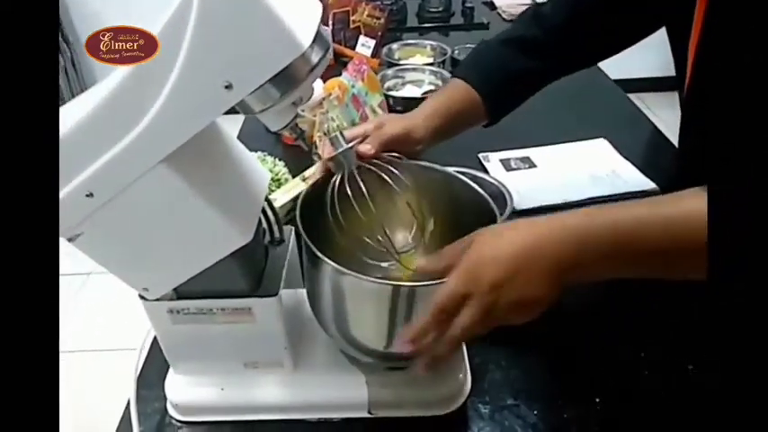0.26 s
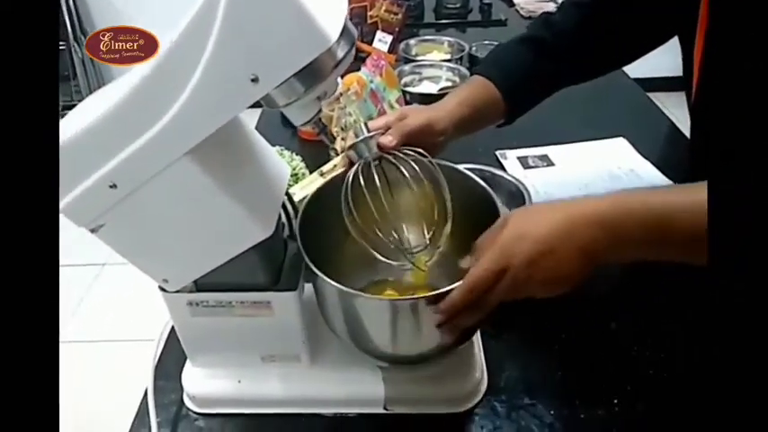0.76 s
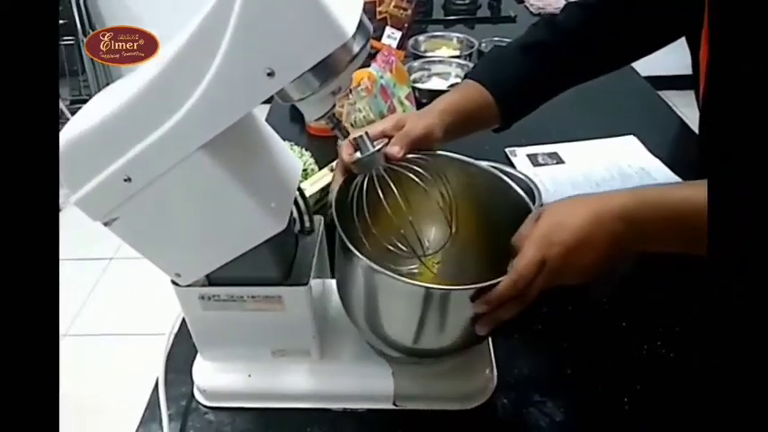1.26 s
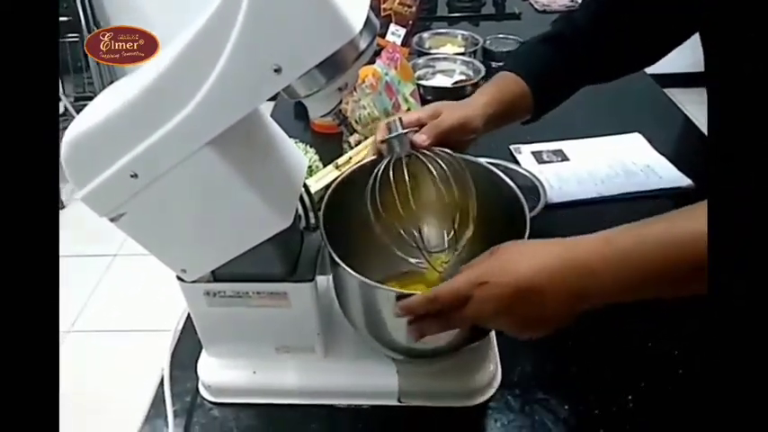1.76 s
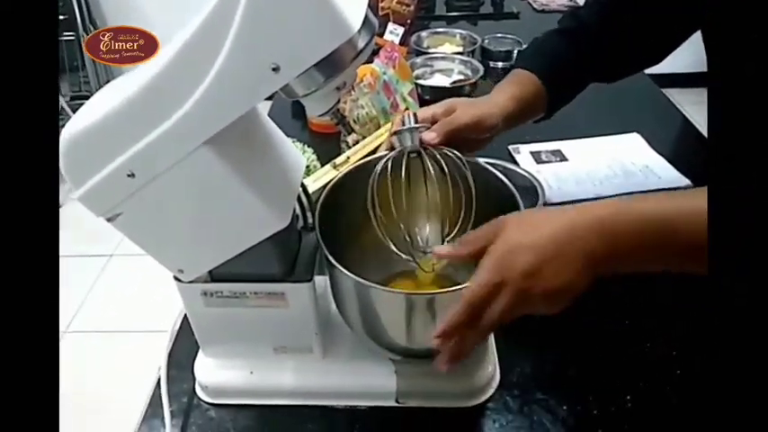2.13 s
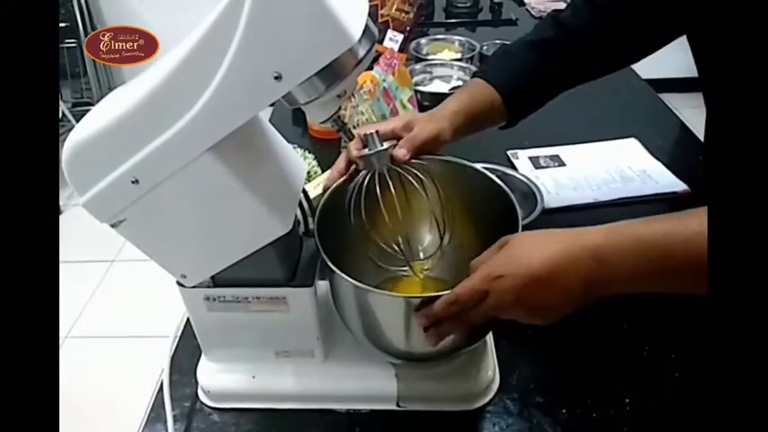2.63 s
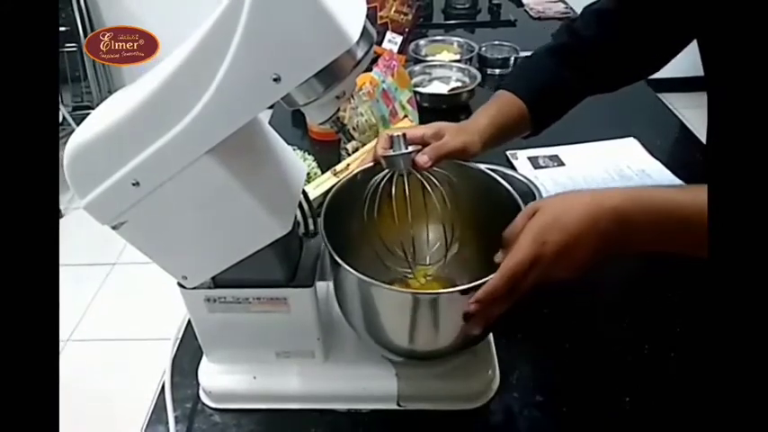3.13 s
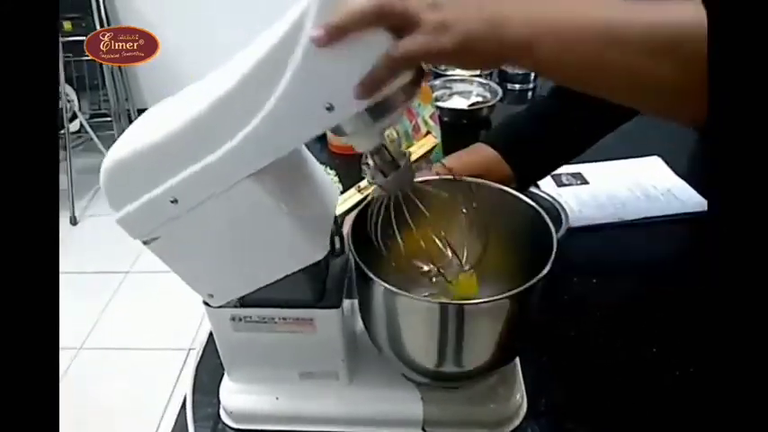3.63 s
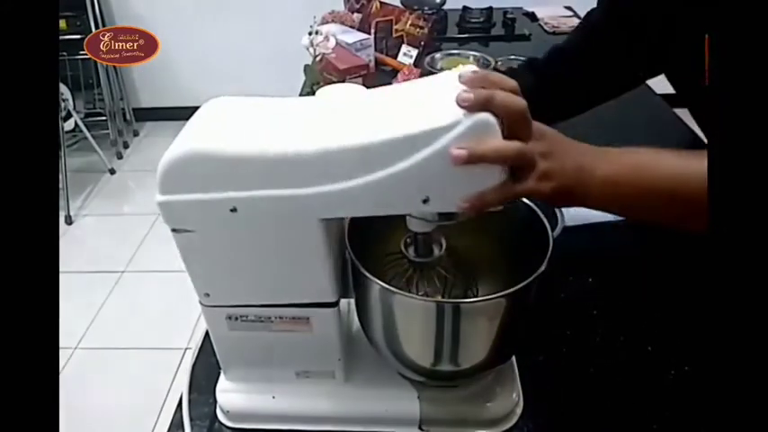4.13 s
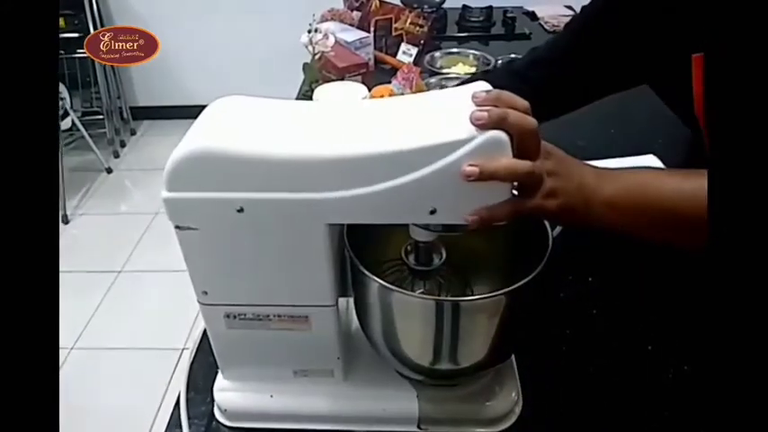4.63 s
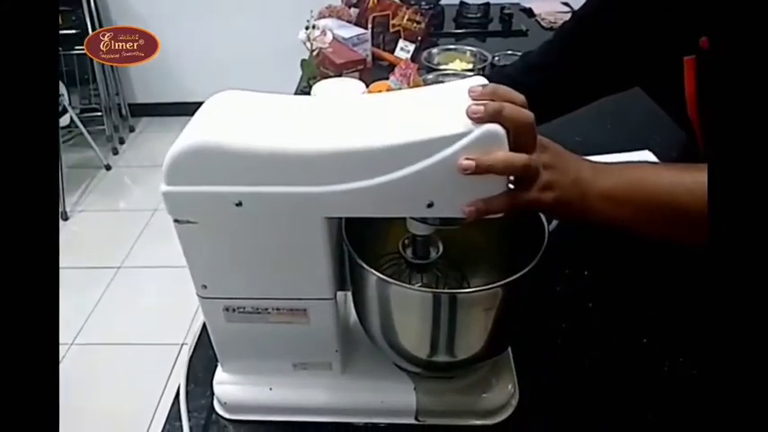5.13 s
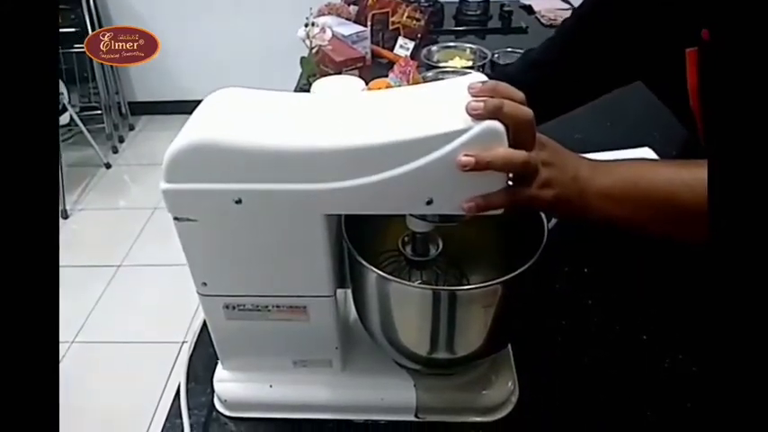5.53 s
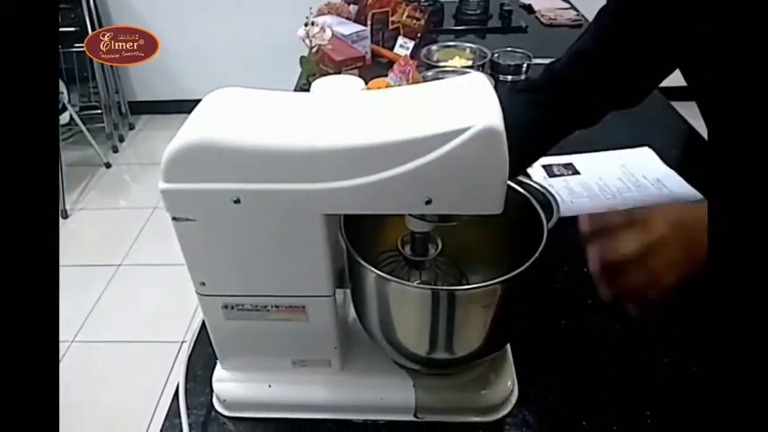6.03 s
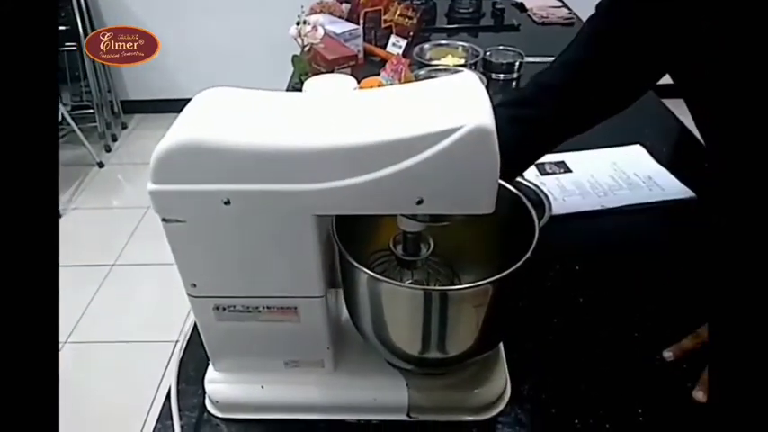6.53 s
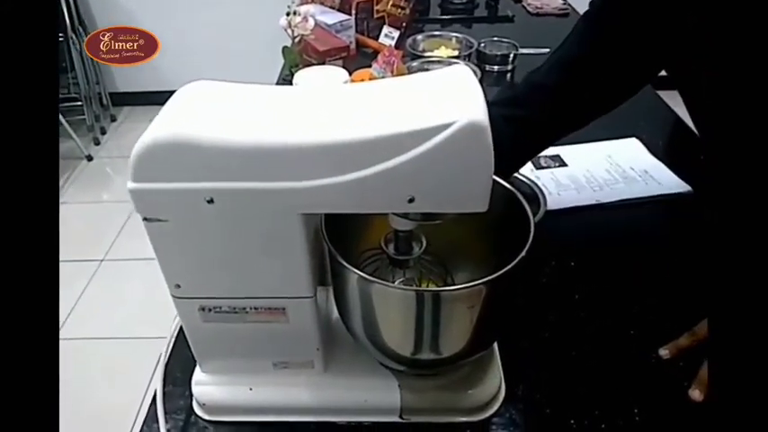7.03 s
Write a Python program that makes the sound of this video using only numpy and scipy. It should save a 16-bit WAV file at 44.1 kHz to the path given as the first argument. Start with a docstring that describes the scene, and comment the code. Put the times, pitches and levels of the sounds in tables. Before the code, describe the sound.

A nearby stereo camera microphone catches metal handling in a reverberant kitchen: strong bowl knocks first, then thin whisk clinks, sliding wires and little squeaks, with dull bumps through the counter. The mixer head scrapes free, groans as it swings down, and hits its stop with a bright, heavy clank. A smaller latch clack follows, then faint ticks over low air noise, its tails thinned by noise suppression.

```python
"""In a tiled kitchen a steel bowl is twisted onto the base of a stand mixer: ringing modes under a noisy contact.
A wire whisk clinks and slides on its wall, as bright modes and strokes of hiss; the rubbed rim squeaks.
The mixer's head is released, swings down on a groaning hinge, clanks home and latches.
The room answers the blows with blurred, decaying noise; the air murmurs underneath.
The camera's noise suppressor pulls the faint tails down."""
import sys
import numpy as np
from scipy import signal
from scipy.fft import rfft, irfft, next_fast_len
from scipy.io import wavfile
from scipy.ndimage import uniform_filter1d, map_coordinates

SR = 44100
rng = np.random.default_rng(int(sys.argv[2]) if len(sys.argv) > 2 else 0)


def master(y):
    """Save y as 16-bit WAV."""
    cut = np.clip(np.atleast_2d(y).T, -1, 1)
    pcm = np.round(cut * 32767)  # scale
    wavfile.write(sys.argv[1], SR, pcm.astype(np.int16))


N = 321489
T = np.arange(SR) / SR  # the life of one blow, s

# bowl knocks on its seat: (t/s, level/dB, chatter/s, brightness/dB per octave, room/dB, leading mode f/Hz,
# factor on the ring time: below 1 choked, above 1 ringing longer)
KNOCKS = [(0.0, -24.5, 0.0012, 0.5, -7, 686, 0.49), (.184, -46, 0.0064, -2.5, -4, 781, 0.58),
          (0.4929, -19, 0.0031, 0, -5.5, 690, 1.06), (.521, -36, 0.004, 1.5, -5, 425, 1.5),
          (.537, -33.5, 0.015, 3.5, 1.5, 280, 1.4), (.581, -37.5, 0.0026, -4, -3, 768, 1),
          (.605, -32.5, 0.0091, -3.5, -10, 759, 0.61), (0.705, -27.5, 0.0048, -1.5, -14, 1078, 0.44),
          (1.243, -43.5, 0.0028, -4.5, -3, 1048, 0.89), (1.271, -52, 0.0035, -6, -3, 690, .8),
          (1.487, -44, 0.0091, -1.5, 4.5, 1090, 0.29), (1.503, -48, 0.0018, 0, -5.5, 835, 1.2),
          (3.402, -52, 0.0022, -2.5, -1, 1081, 1.2), (3.56, -34.5, 0.0099, -2, -21, 506, 0.43),
          (3.566, -30.5, 0.011, 0, -23, 198.3, 0.44), (3.581, -38, .006, 1.5, -20, 445, 0.2)]
# whisk wires hit the bowl: (t/s, level/dB, brightness/dB per octave, leading mode f/Hz)
CLINKS = [(.259, -37.5, 1, 2732), (.296, -47.5, -5, 3160), (0.34, -44.5, -1.5, 3270),
          (.543, -41.5, -2, 2575), (0.548, -43.5, 9.5, 6450), (.681, -42.5, -5.5, 2760),
          (0.934, -48, 5, 3190), (1.055, -56.5, 6, 6270), (1.216, -49, 2.5, 5640), (1.226, -52, -4.5, 3220),
          (1.598, -47, 3, 3150), (1.615, -47.5, -3.5, 5590), (2.528, -49.5, 2, 2280),
          (2.537, -44, -3, 2530), (2.846, -50, 3, 6020), (2.981, -50.5, 4.5, 6080),
          (3.011, -51.5, 1.5, 5600), (3.06, -57, -4.5, 6280), (3.243, -50, 2.5, 6530),
          (3.258, -54.5, -7, 2290), (3.422, -45, 3.5, 6266), (3.43, -49.5, -9, 1850),
          (3.726, -49, -4.5, 4500)]
# wires slide along the bowl: (t/s, level/dB, length/s)
SLIDES = [(0.11, -63.5, 0.084), (0.301, -56, 0.095), (0.957, -54.5, .2), (2.335, -56.5, 0.13),
          (3.0, -60.5, .07), (3.261, -59, 0.066), (3.582, -49.5, 0.05), (4.82, -54.5, 0.1)]
# the rubbed rim sings briefly: (t/s, level/dB, f/Hz, length/s)
SQUEAKS = [(0.276, -43.5, 330.5, 0.097), (0.344, -48.5, 336, 0.07), (1.211, -47.5, 1036, 0.034),
           (1.894, -55, 346, 0.096), (2.375, -51, 401, 0.034), (2.428, -51.5, 321, 0.058),
           (3.233, -49, 1078, 0.044), (3.38, -51, 1075, 0.11), (3.476, -42, 779, 0.11)]
# the head clanks on catch, buffer, stop and latch, which rebounds: (t/s, level/dB, chatter/s,
# brightness/dB per octave, room/dB, leading mode f/Hz, its level/dB, all modes level/dB, room t60/s)
CLANKS = [(3.646, -27, 0.011, 0.44, -2.5, 782, -6.5, -7, 0.97),
          (4.3697, -27, 0.0055, 0, 0, 953, -0.5, 1.5, 0.37),
          (4.4219, -19, 0.005, 2, 4, 1057, -4.5, -4, 0.94), (5.295, -34, 0.004, 1, 0, 1051, -12, -6, 0.73),
          (5.309, -48, .003, -1, -2.5, 344, -7, -6, 0.49)]
# the hinge sticks and groans as the head swings: (t/s, level/dB, length/s, f/Hz)
GROANS = [(3.743, -38.5, 0.04, 393.5), (3.791, -44.5, 0.082, 356.2), (3.865, -39, 0.059, 358.5),
          (3.928, -44, 0.043, 350.5), (3.977, -48.5, 0.087, 330)]
# ticks and soft scrapes of the fittings: (t/s, level/dB, centre f/Hz, half width/octaves, t60/s)
FITTINGS = [(1.878, -48.5, 6790, 1, 0.0146), (2.12, -61, 7623, 0.85, 0.25),
            (2.846, -51.5, 1710, 0.25, 0.12), (2.98, -57, 1770, .2, 0.23),
            (3.061, -54.5, 1600, 0.58, 0.036), (3.486, -27.5, 1895, 0.77, 0.0073),
            (5.751, -55, 3157, 0.2, 0.087), (5.84, -60.5, 1149, .5, 0.25), (5.841, -59.5, 8300, 0.62, 0.11),
            (6.59, -66.5, 5250, 0.18, 0.69)]
# the mixer thumps on the counter: (t/s, level/dB, f/Hz)
THUMPS = [(0.536, -43.5, 79), (0.703, -36, 76.25), (2.741, -46, 54), (2.997, -42.5, 69), (3.137, -40.5, 55),
          (3.485, -27, 57), (3.559, -37, 79.6), (4.424, -46.5, 58.24)]

# ringing modes of each part: (f/Hz, level/dB, t60/s)
BOWL_MODES = [(343, -5.5, 0.64), (420.7, -4, 0.36), (681, 1.5, 0.26), (776, -1.5, 0.2), (897, -5.5, 0.45),
              (1040, -13, 0.21), (1070, 1, 0.34), (1143, -5, 0.24), (1245, -11.5, 0.33),
              (1490, -13.5, 0.15), (2040, -17, 0.16), (2185, -10, 0.21), (2460, -24, .4), (2730, -29, 0.55)]
WHISK_MODES = [(1664, -8.5, 0.15), (2300, -13.5, 0.11), (2530, 1, 0.36), (2786, 1.5, 0.4), (3193, -6.5, 1),
               (4190, -5.5, 0.21), (5010, -8, 0.35), (5540, -6, 0.7), (5690, -6, 0.39), (6370, -10.5, 0.65),
               (6660, -14.5, 0.37), (7300, -9.5, 0.5), (8630, -4.5, 0.31), (9300, -8.5, 0.61),
               (10500, -9.5, .25)]
CATCH_MODES = [(766, -3.5, 0.12), (1106, -6, .2), (1278, -1.5, 0.22), (1803, -2, 0.5), (2124, -4, 0.51),
               (2590, -2.5, 0.6), (3451, -6.5, 0.37), (5160, -6, 0.19)]
BUFFER_MODES = [(983, -3.5, 0.081), (1770, 7.5, 0.21), (1912, 6, 0.2), (2660, -7.5, 0.085),
                (4320, -12, 0.2), (4876, -13, 0.12)]
HEAD_MODES = [(346, -8.5, 0.5), (427, -10, 0.49), (652, -2, 0.52), (970, -3.5, .6), (1050, -5, 0.7),
              (1667, -5.5, 0.72), (1940, -3, .55), (2000, -2, 0.8), (2030, -5, 0.52), (2471, 1, 0.54),
              (2545, -2, .7), (2896, -10.5, .55), (3635, -11.5, .5), (3950, -6.5, 0.54)]
LATCH_MODES = [(344, 1, 0.36), (406.3, -2.5, 0.29), (852.3, -11, .25), (1040, -8, 0.56), (1112, -5.5, 0.6),
               (1390, -8.5, 0.31), (1800, -7, 0.4), (2020, -10.5, 0.17), (2570, -8, 0.4), (2940, -7, 0.29),
               (3639, -7, .4)]

# the crowd of quickly dying modes of each part: (f/Hz, level/dB per Hz)
BOWL_BODY = [(40, -48), (150, -16), (350, -3), (530, -10), (690, -7), (880, -7), (1100, -8.5),
             (1450, -18.5), (1750, -26.5), (2150, -19), (2450, -28), (2800, -29.5), (3400, -36.5),
             (3900, -43.5), (4600, -38.5), (9000, -44), (13000, -54)]
WHISK_BODY = [(300, -7), (1400, -9.5), (2100, -4.5), (2700, -5), (3300, -1), (3800, -11.5), (5250, -12.5),
              (5700, -2), (7900, -6.5), (10000, -7), (13000, -16.5)]
CATCH_BODY = [(60, -33), (200, -20.5), (500, -4), (850, 2), (1450, 1.5), (2700, 0.5), (3500, -5),
              (3850, -14), (4500, -6.5), (5500, -6), (8000, -15.5), (8900, -7), (10400, -11),
              (13000, -26.5)]
HEAD_BODY = [(60, -36), (180, -23), (260, -5), (500, -1), (1000, 2.5), (1500, -0.5), (2300, 3), (3000, -3),
             (5500, -5.5), (7500, -20.5), (10300, -16.5), (13000, -37.5)]
LATCH_BODY = [(60, -39.5), (200, -30), (340, -4.5), (520, -12), (750, -3.5), (1050, -3.5), (1400, -5.5),
              (3000, -4), (3700, -9), (4150, -16), (5400, -9.5), (7000, -19.5), (9500, -13.5), (13000, -18)]

# colours of the hinge's rasp and of the room's air: (f/Hz, level/dB per Hz)
HINGE_RASP = [(100, -27), (270, -12), (350, 2), (420, -1), (520, -13), (1200, -12.5), (4000, -87)]
AIR = [(15, -29.5), (25, -3.5), (97, -2), (130, -0.5), (237, -5), (257, -1), (316, 1), (593, -11),
       (878, -7.5), (975, -8.5), (1270, -14), (4220, -24.5), (5340, -28), (6940, -30), (13000, -33.5)]
# colours of the sliding wires' hiss and the counter's thud: (f/Hz, level/dB per Hz)
SLIDE_HISS = [(500, -10.0), (2800, 1.0), (4300, -15.0), (6300, -4.5),
              (8000, -6.5), (10000, -5.0), (13000, -14.0)]
COUNTER_THUD = [(30, -11.5), (60, 5.0), (130, -11), (220, -14.5), (500, -17.5), (2000, -56.5)]
# colour of the rim's rasp: (f over the squeak's f, level/dB per Hz)
RIM_RASP = [(1 / 3, -14), (0.32, -8), (1, 0), (1.4, -9), (3, -26), (9, -50)]
# colour of a fitting's burst, its points out of pitch order: (half widths from the centre, level/dB per Hz)
FITTING_BAND = [(-1.0, -16.0), (-4.85, -5.5), (1.57, 3.5), (-0.86, -16), (5.0, -28.5), (3.5, -50.0)]

# left-right likeness of the air, then of everything else: (f/Hz, likeness)
AIR_ALIKE = [(60, 0.88), (150, 0.94), (350, 0.92), (700, 0.83), (1200, 0.016), (2200, 0)]
ALIKE = [(50, 0.88), (150, 0.95), (350, 0.97), (700, 0.7), (1200, 0.19), (2200, 0)]
# balance of the two microphone ports: (f/Hz, left minus right/dB)
PORTS = [(700, 0.5), (2100, -0.5), (3000, 3), (4400, 7.5), (6300, 6), (7200, -11.5), (8200, -14.5),
         (10000, -13), (12600, -7)]

SING_DB, SMEAR_DB_PER_S = 8.5, 898.5  # a clean knock lets one mode sing; chatter smears it
CHATTER_DAMPS_DB_PER_S = 245.5  # parts that keep touching stop the bowl's ring
WIRE_CHATTER_S, WIRE_ROOM_DB = 0.0029, -3.5  # every tap of the wires
FREE_DB = -40.5  # a tap this hard bounces clear of the wall
WIRE_SING_DB, WIRE_SING_SLOPE = 2, 0.28  # leading mode of such a tap, and dB lost per dB of a softer one
PRESSED_DB, PRESSED_HZ = 8.5, 3700  # loss of a fully pressed wire, mostly below this pitch
WIRE_T60_S = 0.16  # rattle after a free tap; pressed ones die sooner
WIRE_RING_DB, WIRE_RING_PRESSED_DB = -0.5, 5.5  # clear modes of a free tap, and their loss when fully pressed
TWIN_RATIO, TWIN_DB, TWIN_T60_S = 1.003, -24, 0.43  # close twin of the leading mode, when the part is free
MODE_SWAY, MODE_SWAY_PER_S = 0.31, 22  # modes beat: share of the swing, and random turns per second
THICKET_HZ = 2840  # above this pitch the chance upper modes have their full depth
RIM_RASP_DB = -3.5  # friction noise around the singing mode
SCRAPE_START_S, SCRAPE_END_DB, SCRAPE_LENGTH_S = 3.622, -29.5, 0.032  # the whisk's shaft scrapes into its socket before it catches
SCRAPE_SWELL_DB = 9.5  # growth over that length
GROAN_RASP_DB, GROAN_FLUTTER_DB = -5, 1.5  # noise around the hinge's tone; its uneven grip
FITTING_ROOM_DB, FITTING_ROOM_T60_S = -9, 0.74  # the walls' answer to a fitting
FITTING_SHORT_S = .04  # a burst whose t60 is well below this hardly stirs the room
THUMP_CYCLES = 13  # a bump dies by 60 dB in this many swings
ECHO_CLUMP_DB = 1  # the walls' echoes arrive in uneven bunches
TOP_HZ = 13100  # band limit


def amp(db):
    """Decibels to gain."""
    return 10 ** (np.asarray(db) / 20)


def unit(x):
    """Scaled to rms 1."""
    return x / np.sqrt(np.mean(x ** 2) + 1e-20)


def along(points, hz):
    """Reads a curve of (f/Hz, value) points on a log pitch axis."""
    f, v = np.transpose(points)
    return np.interp(np.log(hz + 1), np.log(f), v)


def filtered(x, response):
    """Shapes x with a gain that is a function of frequency."""
    n = x.shape[-1]
    m = next_fast_len(n + SR // 10)
    return irfft(rfft(x, m) * response(np.fft.rfftfreq(m, 1 / SR)), m)[..., :n]


def noise(spectrum, size, alike=ALIKE):
    """Coloured stereo noise of rms 1; mid and side are weighted to give the left-right likeness."""
    turn = lambda hz: np.arccos(np.clip(along(alike, hz), -1, 1)) / 2
    colour = lambda hz: amp(along(spectrum, hz)) * [np.cos(turn(hz)), np.sin(turn(hz))]
    mid, side = filtered(rng.standard_normal((2, size)), colour)
    return unit(np.array([mid + side, mid - side]))


def flutter(depth_db, shape, smooth):
    """A random wandering gain, smoothed over a number of samples."""
    return amp(depth_db * unit(uniform_filter1d(rng.standard_normal(shape), size=smooth)))


def fade(t60):
    """Falls by 60 dB in t60 seconds."""
    return np.exp(-np.log(1000) * T / max(t60, .001))


def add(track, s, sound):
    """Mixes a sound into the track from time s."""
    start = max(round(s * SR), 0)
    track[:, start:start + len(T)] += sound[:, :N - start]


def stroke(t, length, rise, sag_db, release_db):
    """A rub rises, sags while it lasts and lets go; a quick one does all this faster."""
    u = np.maximum(t, 0) / length
    return np.minimum(u / max(rise, .01), 1) * amp(-sag_db * u - release_db * np.maximum(u - 1, 0))


def ring(modes, sway=MODE_SWAY):
    """Modes that waver and beat; the shorter the wave, the more its phase differs between the ports, up to a cap."""
    out = np.zeros((2, len(T)))
    for hz, db, t60 in modes:
        t = T[T < t60 + .05]
        phase = rng.uniform(0, 2 * np.pi) + np.array([[-1], [1]]) * min(hz / 2800, np.pi / 4)
        steps, knots = rng.standard_normal(size=500), rng.standard_normal(size=64)
        # the phase drifts as a random walk
        walk = np.interp(t * len(steps), np.arange(len(steps)), np.cumsum(steps))
        waver = walk * np.sqrt(hz / len(steps)) * 0.04
        turns = t * MODE_SWAY_PER_S
        beat = 1 + sway * np.minimum(turns, 1) * np.interp(turns, np.arange(len(knots)), knots)
        tone = np.sin(2 * np.pi * hz * t + phase + waver)
        out[:, :len(t)] += amp(db + rng.normal(0, 0.88)) * fade(t60)[:len(t)] * beat * tone
    return out


def thicket(depth_db):
    """Gain of the countless upper modes that one contact happens to excite, as a function of frequency."""
    knots = np.clip(rng.standard_normal(SR // 100), -2, 1)
    depth = lambda hz: depth_db * np.clip(hz / THICKET_HZ, 0, 1)
    return lambda hz: amp(depth(hz) * map_coordinates(knots, [hz / 80], mode="nearest"))


def blow(modes, body, chatter, bright_db, room_db, lead_hz, lead_db, ring_db, body_t60, lead_t60, buzz_db,
         thicket_db, room_t60, free=1):
    """One contact excites a noisy crowd, clear modes, a leading mode and the room; rms 1 over the first 35 ms."""
    chatter = max(chatter, 1 / SR)
    upper = thicket(thicket_db)
    colour = lambda: filtered(noise(body, len(T)), upper)
    # the contact swells while the parts touch, then the body dies away
    after = np.roll(fade(body_t60), int(chatter * SR))
    contact = np.where(T < chatter, 0.87 + 0.24 * T / chatter, after)
    buzz = flutter(buzz_db, len(T), 50)
    # a treble crack starts halfway through the chatter and dies twice as fast
    treble = filtered(colour(), lambda hz: hz ** 2 / (hz ** 2 + 4500 ** 2))
    crack = np.roll(fade(body_t60 / 2), int(chatter * SR / 2)) * treble
    # one short bounce combs the crowd, mostly in the treble
    bounce_s = rng.uniform(.0011, .0017)
    comb = lambda hz: 1 + 0.21 * np.clip(hz / 4000, 0, 1) * np.exp(-2j * np.pi * hz * bounce_s)
    crowd = unit(filtered(buzz * (contact * colour() + 0.83 * crack), comb))
    # the clear modes build up during the chatter
    clear = unit(ring(modes) * np.minimum(T / chatter, 1))
    # the spot that is struck favours one mode
    twin = (lead_hz * TWIN_RATIO, TWIN_DB, TWIN_T60_S * free ** 2)
    lead = unit(ring([(lead_hz, 0, lead_t60), twin]) * (1 - np.exp(-T / (0.000067 + chatter))))
    direct = unit(crowd + amp(ring_db) * clear + amp(lead_db) * lead)
    echo = room(modes + [(lead_hz, lead_db - 0.5, lead_t60)], colour(), ring_db + 0.5, room_t60)
    tilt = lambda hz: amp(bright_db * np.log2(np.clip(hz, 200, 9000) / 1000))
    sound = filtered(direct + amp(room_db) * echo, tilt)
    return sound / np.sqrt(np.mean(sound[:, T < .035] ** 2))


def bowl():
    """The bowl knocks short and hollow; each knock chokes or lengthens the ring of its modes and body."""
    out = np.zeros((2, N))
    for s, db, chatter, bright_db, room_db, lead_hz, free in KNOCKS:
        lead_db = SING_DB - SMEAR_DB_PER_S * chatter
        ring_db = 0.5 - CHATTER_DAMPS_DB_PER_S * chatter
        modes = [(hz, level, t60 * free) for hz, level, t60 in BOWL_MODES]
        knock = blow(modes, BOWL_BODY, chatter, bright_db, room_db, lead_hz, lead_db, ring_db,
                     body_t60=0.089 * free, lead_t60=0.065 * free, buzz_db=0.0, thicket_db=10.0,
                     room_t60=0.94, free=free)
        add(out, s, amp(db) * knock)
    return out


def whisk():
    """Springy wires chatter on the steel: hard taps ring on, light ones stay pressed, damped and detuned."""
    out = np.zeros((2, N))
    for s, db, bright_db, lead_hz in CLINKS:
        free = np.clip(amp(db - FREE_DB), .35, 1)
        pressed = 1 - free
        muted_db = lambda hz: PRESSED_DB * pressed / (1 + (hz / PRESSED_HZ) ** 4)
        modes = [(hz * (1 + rng.normal(0, 0.03) * pressed), level - muted_db(hz), t60 * free)
                 for hz, level, t60 in WHISK_MODES]
        lead_db = WIRE_SING_DB + WIRE_SING_SLOPE * (db - FREE_DB)
        ring_db = WIRE_RING_DB - WIRE_RING_PRESSED_DB * pressed
        clink = blow(modes, WHISK_BODY, WIRE_CHATTER_S, bright_db, WIRE_ROOM_DB, lead_hz, lead_db, ring_db,
                     body_t60=WIRE_T60_S * free, lead_t60=0.28 * free, buzz_db=2.0, thicket_db=5,
                     room_t60=0.9, free=free)
        add(out, s, amp(db) * clink)
    return out


def slides():
    """Wires hiss where they slide along the bowl, under an unevenly fluttering grip."""
    grip = unit(flutter(1.3, N, 200))
    hiss = unit(filtered(noise(SLIDE_HISS, N), thicket(depth_db=6.5)))
    t = np.arange(N) / SR
    rubs = sum(amp(db) * stroke(t - s, length, rise=0.2, sag_db=4.2, release_db=6) for s, db, length in SLIDES)
    return rubs * grip * hiss


def rim():
    """Steel sticks and slips, swelling one mode of the bowl for a moment."""
    out = np.zeros((2, N))
    for s, db, hz, length in SQUEAKS:
        swell = np.sin(np.pi * np.minimum(T / length, 1))
        rasp = noise([(hz * ratio, level) for ratio, level in RIM_RASP], len(T))
        add(out, s, amp(db) * swell * (ring([(hz, 0, 1)], sway=0) + amp(RIM_RASP_DB) * rasp))
    return out


def head():
    """The whisk's shaft scrapes into its socket with swelling noise until it catches; then the heavy head
    clanks on four parts in turn."""
    out = np.zeros((2, N))
    swell = amp(SCRAPE_END_DB + SCRAPE_SWELL_DB * np.minimum(T / SCRAPE_LENGTH_S - 1, 0))
    add(out, SCRAPE_START_S, swell * (T < SCRAPE_LENGTH_S) * noise(CATCH_BODY, len(T)))
    parts = [(CATCH_MODES, CATCH_BODY), (BUFFER_MODES, HEAD_BODY), (HEAD_MODES, HEAD_BODY),
             (LATCH_MODES, LATCH_BODY), (LATCH_MODES, LATCH_BODY)]
    # contact: chatter, brightness, room level, leading mode and its level, level of all modes
    for (s, db, *contact, room_t60), (modes, body) in zip(CLANKS, parts):
        clank = blow(modes, body, *contact, body_t60=0.054, lead_t60=0.069, buzz_db=1.0,
                     thicket_db=-0.5, room_t60=room_t60)
        add(out, s, amp(db) * clank)
    return out


def hinge():
    """The dry hinge drives one low mode of the housing in fits, with a rasp around it."""
    out = np.zeros((2, N))
    for s, db, length, hz in GROANS:
        grip = unit(flutter(GROAN_FLUTTER_DB, len(T), 500))
        groan = grip * ring([(hz, 0, 2)], sway=0) + amp(GROAN_RASP_DB) * noise(HINGE_RASP, len(T))
        add(out, s, amp(db) * stroke(T, length, rise=0.13, sag_db=3.4, release_db=45) * groan)
    return out


def fittings():
    """Ticks and soft scrapes: bursts of coloured noise, some short, some slowly fading, with a tail of room."""
    out = np.zeros((2, N))
    for s, db, hz, width, t60 in FITTINGS:
        band = [(hz * 2 ** (k * width), level) for k, level in FITTING_BAND]
        stirred = min(t60 / FITTING_SHORT_S, 1) ** 2
        tail = amp(FITTING_ROOM_DB) * fade(FITTING_ROOM_T60_S) * stirred
        add(out, s, amp(db) * (fade(t60) + tail) * noise(band, len(T)))
    return out


def thumps():
    """Dull bumps through the counter: a low decaying tone with a thud of noise, louder on the left."""
    out = np.zeros((2, N))
    for s, db, hz in THUMPS:
        sway = np.sin(2 * np.pi * hz * T) + 0.72 * noise(COUNTER_THUD, len(T))
        envelope = fade(THUMP_CYCLES / hz) * (1 - np.exp(-T / 0.0024))
        add(out, s, amp(db) * envelope * sway * amp([[2], [-4]]))
    return out


def room(modes, colour, ring_db, t60):
    """The walls return the object's colour, its modes blurred into narrow bands; above 8 kHz the tail fades
    faster."""
    width = lambda hz: 7 + hz / 400
    band = lambda f, hz: 1 / (1 + ((f - hz) / width(hz)) ** 4) / width(hz)
    peaks = lambda f: np.sqrt(sum(amp(2 * db) * band(f, hz) for hz, db, _ in modes))
    white = noise([(20, 0), (SR / 2, 0)], len(T))
    walls = unit(colour) + amp(ring_db) * unit(filtered(white, peaks))
    low = filtered(walls, lambda hz: 1 / (1 + (hz / 8000) ** 4))
    clumps = flutter(ECHO_CLUMP_DB, (2, len(T)), 250)
    tail = low * fade(t60) + 0.55 * (walls - low) * fade(0.9 * t60)
    return unit(clumps * tail * (1 - np.exp(-T / 0.0067)))


def air():
    """The room's air murmurs as steady coloured noise, much alike left and right in the bass."""
    return amp(-55.0) * noise(AIR, N, AIR_ALIKE)


def scene():
    """Each port colours the mixer in its own way and loses the deepest bass; the air lies below."""
    mixer = bowl() + whisk() + slides() + rim() + head() + hinge() + fittings() + thumps()
    balance = lambda hz: np.sqrt(2 / (1 + amp(np.outer([-2, 2], along(PORTS, hz)))))
    bass_cut = lambda hz: (1j * hz / (1j * hz + 28)) ** 2
    return filtered(mixer, lambda hz: balance(hz) * bass_cut(hz)) + air()


def record(dry):
    """The suppressor dips what is near the steady noise by up to 10 dB; nothing passes above the band limit."""
    z = signal.stft(dry, nperseg=512)[2]
    power = np.mean(np.abs(z) ** 2, axis=0)
    power = uniform_filter1d(power, size=3, axis=0)  # across pitch
    power = np.abs(uniform_filter1d(power, size=5, axis=1))  # across time
    steady = np.percentile(power, 20, axis=1, keepdims=True) + 1e-20
    gain = amp(-10 / (1 + (power / steady / amp(20.5)) ** 2))
    quieted = signal.istft(z * gain, nperseg=512)[1][:, :N]
    return filtered(quieted, lambda hz: hz < TOP_HZ)


dry = scene()
out = record(dry)
master(out)
```